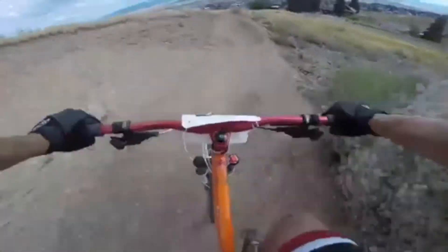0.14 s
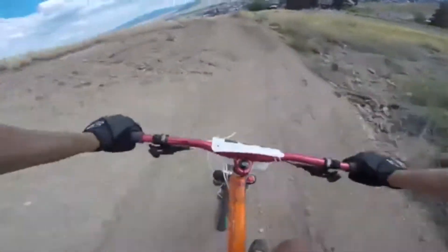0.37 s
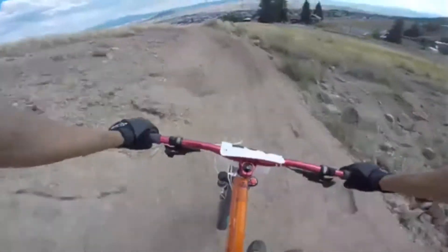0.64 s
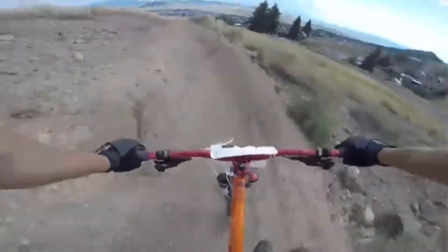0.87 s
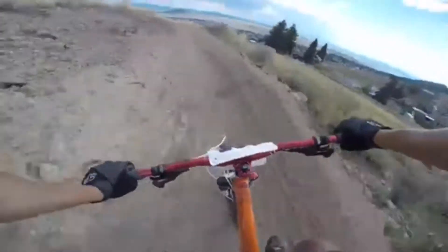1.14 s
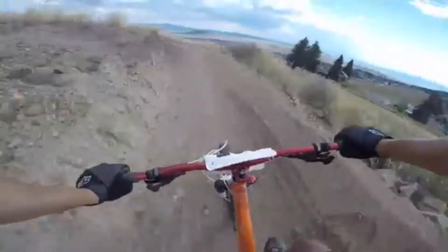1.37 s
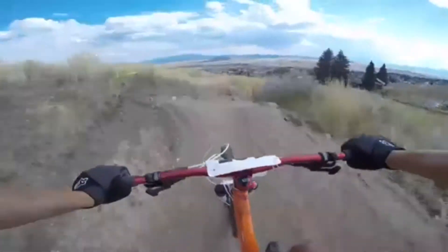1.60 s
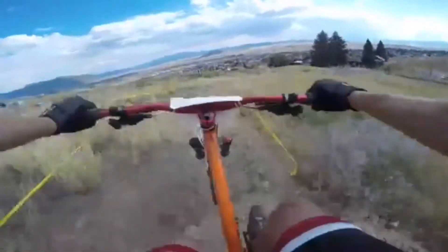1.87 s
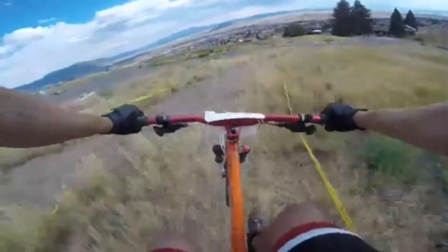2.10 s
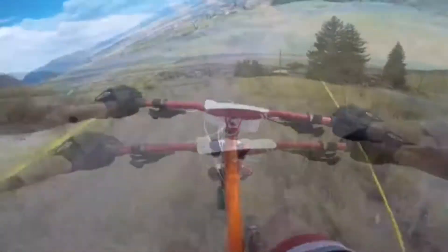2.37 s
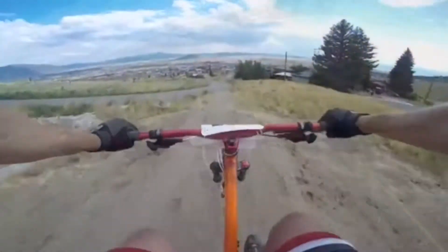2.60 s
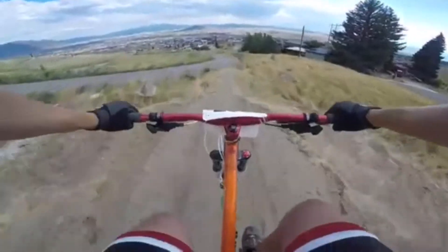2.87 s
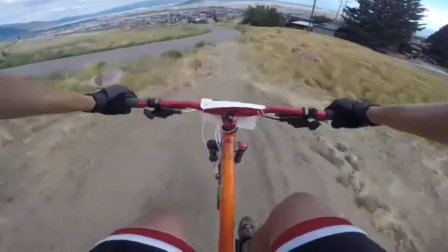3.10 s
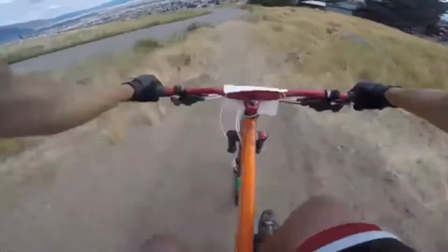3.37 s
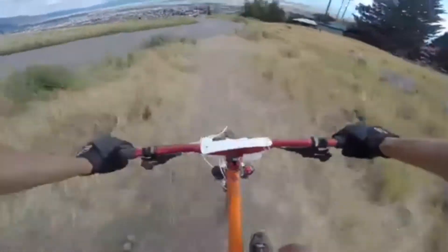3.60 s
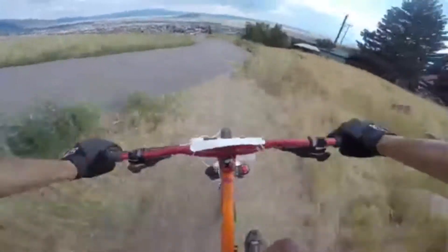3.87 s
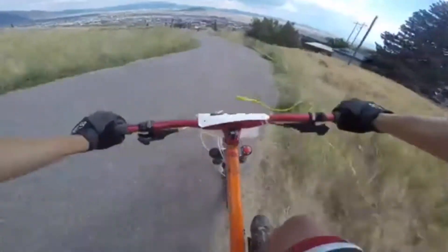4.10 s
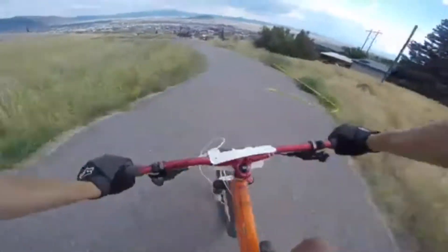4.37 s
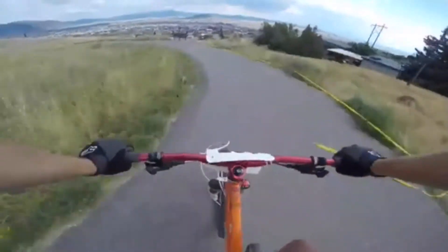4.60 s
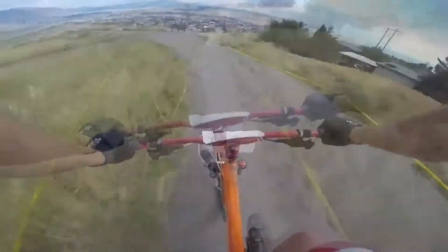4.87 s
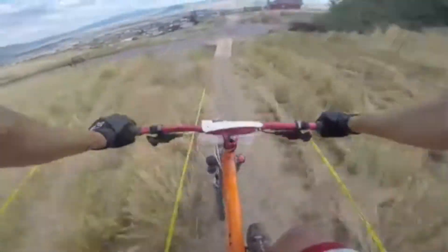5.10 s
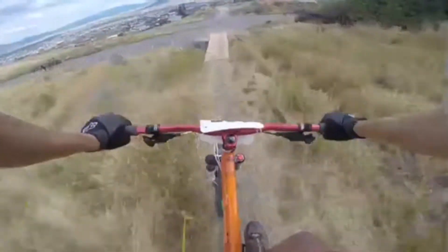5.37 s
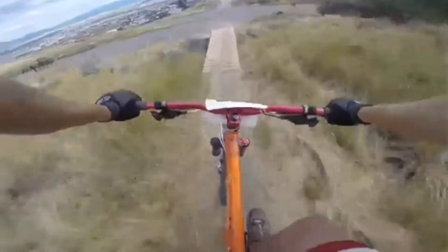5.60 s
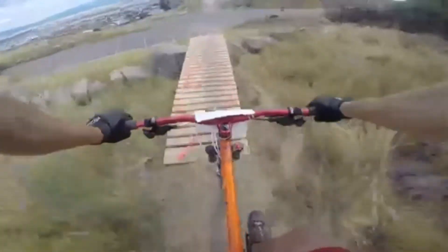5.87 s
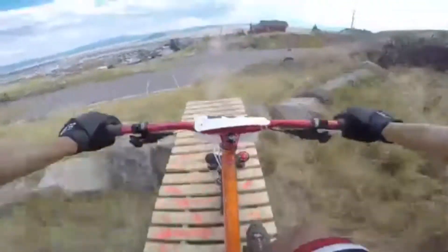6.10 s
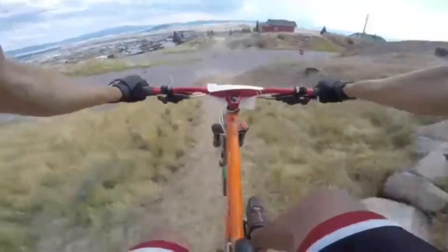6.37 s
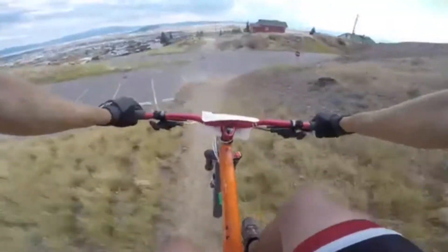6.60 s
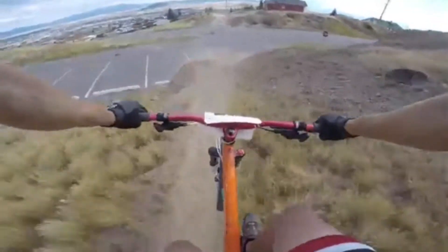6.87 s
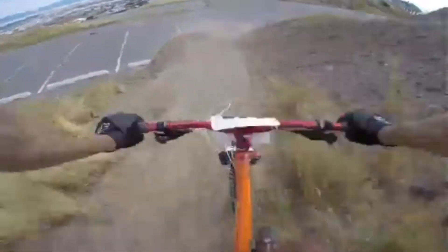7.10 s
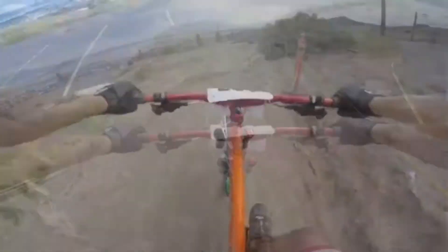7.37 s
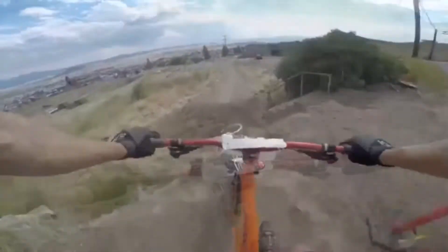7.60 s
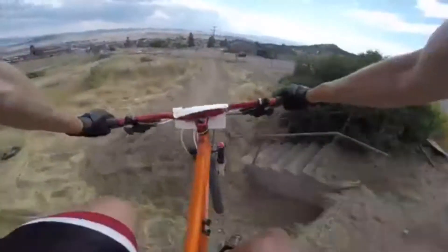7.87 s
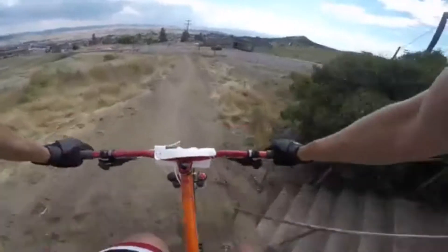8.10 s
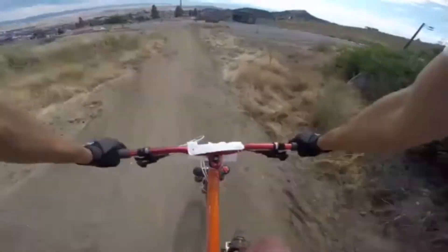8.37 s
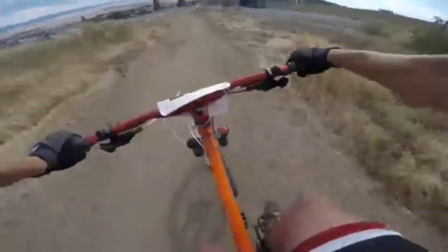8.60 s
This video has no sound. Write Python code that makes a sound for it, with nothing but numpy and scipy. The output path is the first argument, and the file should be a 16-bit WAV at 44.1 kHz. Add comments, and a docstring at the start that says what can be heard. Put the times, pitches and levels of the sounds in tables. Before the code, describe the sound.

Close, boxy rumble and rattle of a bike on a dirt trail, calmer stretches broken by bursts of hard knocks and heavy thumps.

```python
"""A rough rumble and gritty rattle of rolling tyres come first, with faint hiss and whine, then jolts and knocks.
A mountain bike runs down a dirt trail, heard by a small camera in a closed housing on the rider's chest.
Noise grains excite rumble, drone and housing modes; jolts are damped swings of the harness; camera clanks and
chain ticks are noisy contacts through resonances or treble filters. Brake squeals, in two groups, and a low
tread hum are randomly wavering tones; the electronics add shaped noise and steady sines."""
import sys
import numpy as np
from scipy import signal
from scipy.fft import rfft, irfft, next_fast_len
from scipy.io import wavfile
from scipy.ndimage import uniform_filter1d, map_coordinates

SR = 44100
rng = np.random.default_rng(int(sys.argv[2]) if len(sys.argv) > 2 else 0)


def master(y):
    """Save y as 16-bit WAV."""
    cut = np.clip(np.atleast_2d(y).T, -1, 1)
    pcm = np.round(cut * 32767)  # scale
    wavfile.write(sys.argv[1], SR, pcm.astype(np.int16))


def makeup_ratio(level_db):
    """Linear amplitude ratio for a level in decibels (20 dB per factor of ten)."""
    decades = np.asarray(level_db, float) / 20
    return 10 ** decades


N = 384993
T = np.arange(N) / SR
RIDE_SIZE = 2 * next_fast_len(N // 2 + 4096)  # filter length of the steady layers, samples


def spectrum(points, size):
    """Gain per bin of (Hz, dB) points, interpolated over log frequency."""
    hz, db = np.transpose(points)
    bin_hz = np.arange(size // 2 + 1) * SR / size
    return makeup_ratio(np.interp(np.log(bin_hz + 1), np.log(hz), db))


def modes(rows, size):
    """Causal response per bin of resonances in parallel, alternate signs."""
    f = np.arange(size // 2 + 1) * SR / size
    response = 0
    for k, (hz, width_hz, db) in enumerate(rows):
        damping = 1j * f * width_hz
        response = response + (-1) ** k * makeup_ratio(db) * damping / (hz ** 2 - f ** 2 + damping)
    return response


def colour(x, gain):
    """Filter along the last axis."""
    size = 2 * gain.shape[-1] - 2
    return irfft(rfft(x, size) * gain)[..., :x.shape[-1]]


def unit(x):
    """Scale to rms 1."""
    return x / np.sqrt(np.mean(x ** 2))


def walk(rate_hz):
    """Random levels held 1 / rate_hz s and slewed twice; spread near 1."""
    k = int(SR / rate_hz)
    held_levels = np.repeat(rng.standard_normal(N // k + 1), k)
    return 1.3 * uniform_filter1d(uniform_filter1d(held_levels, k), k)[:N]


def grit(rate_hz, spread_db, burst_ms, smooth, flicker_db, flicker_hz):
    """Short scrapes of uneven size over a smooth noise, the whole flickering."""
    sizes = makeup_ratio(spread_db * np.minimum(rng.exponential(size=N), 3.5))
    starts = (rng.random(N) < rate_hz / SR) * sizes
    scrapes = signal.fftconvolve(starts, np.hanning(int(burst_ms * SR / 1000)), "same")
    noise = (unit(scrapes) + smooth) * rng.standard_normal(N)
    return unit(noise * makeup_ratio(flicker_db * walk(flicker_hz)))


def add(out, times_s, waves, lead):
    """Lay each wave into out, starting lead samples before its time."""
    for s, wave in zip(times_s, waves):
        at = np.arange(len(wave)) + int(s * SR) - lead
        inside = (at >= 0) & (at < N)
        out[at[inside]] += wave[inside]
    return out


def rattles(length_ms, swell, fade, tail_db, tail_ms, size=4096):
    """Noisy contacts peaking at sample 512: long ones creep in, short ones snap; a ragged chatter surrounds each."""
    ms = (np.arange(size) - 512) * 1000 / SR
    span = length_ms[:, None]
    rise = np.exp(np.minimum(ms, 0) / np.clip(swell * (span - 2.2), .08, 3))
    fall = np.exp(-np.maximum(ms, 0) / (fade * span))
    ragged = np.repeat(rng.random((len(span), size // 64)) ** 2, 64, axis=1)
    chatter = ragged * np.exp(-np.abs(ms) / tail_ms)
    return rise * (fall + makeup_ratio(tail_db) * chatter), rng.standard_normal(rise.shape)


def ring(contact, gain, peak_db):
    """Contacts through a body, each set to its peak level (root 2 times the loudest 2 ms rms)."""
    y = colour(contact, gain)
    top = np.sqrt(2 * uniform_filter1d(y ** 2, size=88, axis=1).max(axis=1))
    return y * (makeup_ratio(peak_db) / top)[:, None]


def wavering(s, db, hz, width_hz):
    """A tone whose size and phase wander at random, the faster the larger width_hz, spreading its line."""
    t = np.arange(int(s[0] * SR), int(s[-1] * SR)) / SR
    steps = np.cumsum(np.interp(t, s, width_hz)) / SR
    knots = rng.standard_normal((2, 512))
    re, im = (map_coordinates(k, [steps], order=1, mode="wrap") for k in knots)
    carrier = np.exp(2j * np.pi * np.cumsum(np.interp(t, s, hz)) / SR)
    edge = np.clip(np.minimum(t - s[0], s[-1] - t) / .006, 0, 1)
    return makeup_ratio(np.interp(t, s, db)) * edge * ((re + 1j * im) * carrier).real


def held(start_s, length_s, db, attack_s, release_s, foot_db):
    """Times and levels of attack, hold and release."""
    times_s = start_s + np.array([0, attack_s, length_s - release_s, length_s])
    return times_s, db + foot_db * np.array([1, 0, 0, 1])


def shudder(blows):
    """Power that builds up before each blow and dies away after it."""
    rise_s, fall_s = 0.02, 0.031
    s, db = np.transpose(blows)[:2]
    t = np.arange(-16384, 16384) / SR
    shape = np.exp(np.where(t < 0, t / rise_s, -t / fall_s))
    return add(np.zeros(N), s, makeup_ratio(db[:, None]) ** 2 * shape, lead=16384)


# The ride's level controls. Each row: time in seconds, harness shake in dB, tyre grit in dB, grit brightness in dB.
GROUND = [(0, -38.5, -44, -2.5), (0.2, -34, -51.5, 1), (0.41, -40, -50.5, 1), (0.87, -43, -51.5, 2),
          (1.2, -45.5, -47, 0.5), (1.68, -38.5, -50.5, -0.5), (1.86, -47, -51, 2.5), (1.92, -46, -57.5, 10),
          (2.03, -46, -55, 3), (2.1, -41, -62.5, 3), (2.3, -43.5, -60, 1), (2.4, -42, -49.5, 0),
          (2.58, -39, -55.5, 6), (2.68, -45.5, -60, 4), (2.9, -45.5, -65, 2), (3.26, -46, -61, 0),
          (3.29, -38, -47.5, -2), (3.4, -31, -41.5, 3), (3.5, -37, -50, -2), (3.74, -35.5, -48.5, 3.5),
          (3.96, -38.5, -44, 2), (4.18, -33.5, -52, 5), (4.6, -47, -48.5, -4.5), (4.84, -44.5, -54.5, -3),
          (5.06, -40.5, -52.5, 3.5), (5.28, -38.5, -52, 3), (5.76, -37, -52, 2), (6.03, -29, -46.5, 1.5),
          (6.32, -35.5, -44.5, -2.5), (6.5, -39, -55, -1.5), (6.71, -36, -62.5, -2),
          (6.85, -45.5, -61.5, -3), (7.05, -39, -57, -1), (7.2, -26, -62, -3), (7.43, -37, -55, 3),
          (7.63, -33.5, -46.5, -5), (7.8, -28.5, -44.5, -1.5), (8.0, -31.5, -47, 0), (8.08, -31, -56.5, 2),
          (8.42, -39.5, -57.5, -3), (8.6, -19.5, -38.5, -7), (8.73, -28.5, -47, 1)]


def over_ground(sound, law, blows):
    """A steady layer sized by its law: it follows the ground and swells around the blows."""
    shake_ref_db, grit_ref_db = -38, -49
    base_db, per_shake, per_grit, per_bright, shudder_db = law
    s, shake_db, grit_db, bright_db = np.transpose(GROUND)
    db = base_db + per_shake * (shake_db - shake_ref_db) + per_grit * (grit_db - grit_ref_db) + per_bright * bright_db
    gain = np.sqrt(makeup_ratio(np.interp(T, s, db)) ** 2 + makeup_ratio(shudder_db) ** 2 * blows)
    return gain * unit(sound)


# Rumble spectrum, relative. Each row: frequency in Hz, density in dB.
RUMBLE_SPECTRUM = [(10, -34), (22, -0.5), (40, 0.5), (65, -11), (95, -8.5), (130, -14.5), (170, -26.5),
                   (300, -90)]
# Layer law (all laws alike): level in dB at the reference ground, then slopes in dB per dB of shake, of grit and
# of brightness, last the shudder in dB against the blow's table level.
RUMBLE_LAW = (-36.5, 0.71, 0.2, 0, -21.5)


def rumble(jolts):
    """Low grained noise of the shaken harness, swelling around the jolts."""
    grain = grit(rate_hz=30, spread_db=4.9, burst_ms=21, smooth=0.8, flicker_db=1.53, flicker_hz=16)
    return over_ground(colour(grain, spectrum(RUMBLE_SPECTRUM, RIDE_SIZE)), RUMBLE_LAW, jolts)


# Drone spectrum, relative. Each row: frequency in Hz, density in dB.
DRONE_SPECTRUM = [(80, 1), (150, 0.5), (300, 0), (450, -6.5), (600, -4.5), (800, -9), (1100, -14),
                  (2000, -47)]
# Layer law: columns as for the rumble, in dB and dB per dB.
DRONE_LAW = (-52, 0.8, 0.28, -0.5, -31)


def drone(shake, knocks):
    """Low-mid noise in very uneven, fast-flickering grains."""
    grain = grit(rate_hz=50, spread_db=8.5, burst_ms=12, smooth=2.0, flicker_db=2.85, flicker_hz=45)
    return over_ground(colour(shake * grain, spectrum(DRONE_SPECTRUM, RIDE_SIZE)), DRONE_LAW, knocks)


# Lower housing modes. Each row: frequency in Hz, width in Hz, relative level in dB.
LOWER_MODES = [(1387, 365, -2.5), (1651, 198, 3)]
# Layer law: columns as for the rumble, in dB and dB per dB.
LOWER_LAW = (-50, -0.02, 1, -.55, -34)


def lower_housing(shake, knocks):
    """Tyre grit rings the lower housing modes."""
    grain = grit(rate_hz=50, spread_db=2.8, burst_ms=6, smooth=2.6, flicker_db=1.2, flicker_hz=50)
    return over_ground(colour(shake * grain, modes(LOWER_MODES, RIDE_SIZE)), LOWER_LAW, knocks)


# Upper housing modes. Each row: frequency in Hz, width in Hz, relative level in dB.
UPPER_MODES = [(2241, 198, 0.5), (2543, 183, 0.5), (2850, 307, -8)]
# Layer law: columns as for the rumble, in dB and dB per dB.
UPPER_LAW = (-49.5, 0.01, 0.99, 0.4, -33)


def upper_housing(shake, knocks):
    """Tyre grit rings the upper housing modes."""
    grain = grit(rate_hz=50, spread_db=2.8, burst_ms=5.5, smooth=2.6, flicker_db=1.2, flicker_hz=50)
    return over_ground(colour(shake * grain, modes(UPPER_MODES, RIDE_SIZE)), UPPER_LAW, knocks)


# Chain contact spectrum, relative. Each row: frequency in Hz, density in dB.
TICK_SPECTRUM = [(4000, -57), (6000, 1), (8000, -6.5), (11000, -12), (14500, -28), (16000, -42)]
# Treble modes. Each row: frequency in Hz, width in Hz, relative level in dB.
TREBLE_MODES = [(3420, 840, -1), (4585, 645, 4.5), (5720, 450, 2.5), (6640, 1000, -1.5), (7750, 5500, -12),
                (11000, 3000, -43.5)]
# Housing wall, which dulls the top. Each row: frequency in Hz, gain in dB.
WALL = [(2600, 6), (3400, 2), (7000, -2), (9500, -3), (15000, -43)]
# Layer law: columns as for the rumble, in dB and dB per dB.
JINGLE_LAW = (-56, 0, 1.06, 0.04, -42)


def jingle(shake, knocks):
    """Grit rings the treble modes behind the wall; chain links touch, sparse, bright and dry."""
    links = grit(rate_hz=22, spread_db=4.6, burst_ms=2.8, smooth=.12, flicker_db=3.6, flicker_hz=13)
    links = unit(colour(links, spectrum(TICK_SPECTRUM, RIDE_SIZE)))
    grain = grit(rate_hz=70, spread_db=2.4, burst_ms=10, smooth=2.3, flicker_db=2.1, flicker_hz=25)
    body = modes(TREBLE_MODES[:5], RIDE_SIZE) * spectrum(WALL, RIDE_SIZE) ** 2
    return over_ground(unit(colour(shake * grain, body)) + makeup_ratio(-18.0) * links, JINGLE_LAW, knocks)


def rolling():
    """The steady parts of the ride, each with its own grain and flicker."""
    knocks = shudder(CLANKS)
    shake = makeup_ratio(1.5 * walk(25))  # small bumps, common to all but the rumble and the links
    return (rumble(shudder(THUDS)) + drone(shake, knocks) + lower_housing(shake, knocks)
            + upper_housing(shake, knocks) + jingle(shake, knocks))


# Hiss spectrum, relative. Each row: frequency in Hz, density in dB.
HISS_SPECTRUM = [(300, -9.5), (1000, -20), (3000, -35), (6000, -33), (10000, -42), (15000, -54)]
# Steady lines. Each row: frequency in Hz, rms level in dB.
WHINE = [(8780, -84.5), (11687, -91), (11719, -89), (12839, -92), (14626, -113)]


def electronics():
    """Microphone hiss and a few thin steady lines."""
    hiss_db = -57
    gain = spectrum(HISS_SPECTRUM, 2 * next_fast_len(N // 2 + 1))
    out = makeup_ratio(hiss_db) * unit(colour(rng.standard_normal(N), gain))
    for hz, db in WHINE:
        out += np.sqrt(2) * makeup_ratio(db) * np.sin(2 * np.pi * hz * T)
    return out


# Jolts through the harness, before its filter. Each row: time of the peak in seconds, swing level in dB,
# length in ms between the -6 dB points.
THUDS = [(0.044, -19, 11.8), (0.149, -3.5, 18), (0.379, -23, 19), (0.54, -27.5, 43), (0.724, -21, 22),
         (0.991, -29, 50), (1.056, -23.5, 26), (1.26, -27.5, 23), (1.383, -21.5, 19), (1.713, -26, 12),
         (1.804, -29, 37), (1.97, -31, 18), (2.052, -24.5, 11), (2.397, -22, 28), (2.432, -25, 18),
         (2.618, -29, 46), (2.774, -32, 18), (2.87, -21.5, 22), (3.216, -22.5, 31), (3.331, -9, 20),
         (3.4, 1, 14.3), (3.442, -20.5, 15), (3.5, -21, 9.8), (3.53, -21.5, 16), (3.562, -26, 10),
         (3.692, -26, 11), (3.856, -20.5, 14), (3.968, -22, 31), (4.075, -21.5, 5.9), (4.157, -25, 6.5),
         (4.406, -20.5, 48), (4.54, -26.5, 21), (4.586, -27.5, 24), (4.864, -24, 14), (5.044, -29, 22),
         (5.124, -23.5, 16), (5.276, -19, 25), (5.305, -28, 52), (5.504, -28, 30), (5.793, -22, 22),
         (5.899, -24, 8.1), (6.033, -14.5, 8.2), (6.081, -12, 42), (6.197, -24, 22), (6.437, -26.5, 16),
         (6.684, -30, 8.3), (6.763, -20, 19), (7.098, -21.5, 6.7), (7.161, -10, 5.5), (7.187, -7.5, 10),
         (7.231, -9, 12), (7.261, -1, 7.8), (7.315, -17.5, 62), (7.401, -30, 8), (7.632, -23, 12.5),
         (7.738, -25, 23), (7.767, -21, 10.7), (7.841, -18, 6.4), (7.879, -26, 23), (8.107, -24.5, 26),
         (8.284, -25, 24), (8.435, -24.5, 8.2), (8.529, -12.5, 3.4), (8.556, -9.5, 9.9), (8.586, -8, 48),
         (8.628, -10, 4.8), (8.654, -12.5, 120), (8.718, -23, 9)]


def thuds():
    """Each jolt is about one swing of the harness, then a slower, weaker rebound."""
    s, db, ms = np.transpose(THUDS)[:, :, None]
    hz = 51.6 * (20 / ms) ** 0.46  # 51.6 Hz for a 20 ms jolt; shorter jolts swing faster
    t = np.arange(-4096, 4096) / SR
    phase = 2 * np.pi * rng.random((len(s), 2)).T[:, :, None]
    swing = makeup_ratio(-6 * (2000 * t / ms) ** 2) * np.cos(2 * np.pi * hz * t + phase[0])
    rebound = makeup_ratio(-6.0) * np.exp(-((t - .016) / 0.017) ** 2) * np.cos(2 * np.pi * 27 * t + phase[1])
    harness = spectrum([(6, -57), (18, -6.5), (170, 2), (300, -30)], size=8192)
    waves = colour(makeup_ratio(db) * (swing + rebound), harness)
    return add(np.zeros(N), s[:, 0], waves, lead=4096)


# Camera knocks in its housing. Each row: time in seconds, peak in dB, length in ms, dull knock in dB and
# upper modes in dB, the last two against the peak.
CLANKS = [(0.0533, -42, 6.1, -15, -10), (0.089, -28, 19, -30, -2), (0.1384, -32, 4.8, 8, -3),
          (0.1607, -24.5, 4.5, -7, -3.5), (0.2158, -29.5, 4.2, -6, -7), (0.2253, -33, 3.3, 3, -14),
          (0.3526, -31, 2.3, -13, -8), (0.904, -27.5, 2.8, -22, -4.5), (1.074, -38, 5, -21, 1),
          (1.117, -28.5, 3.3, -20, -1.5), (1.4184, -35, 8.2, -16, -1), (2.0018, -39.5, 7.4, 1, -1),
          (2.281, -41.5, 6.6, -12, -5), (2.396, -40, 7, 2.5, -9), (3.2817, -34.5, 18, -18, -2),
          (3.336, -19, 3.2, -6, -1), (3.3818, -23.5, 5.9, -1.5, -6.5), (3.3922, -33, 2.6, 8.5, -6),
          (3.4539, -30, 5.4, -3, -9), (3.4921, -16.5, 7.7, -9.5, -6), (3.553, -18, 5.8, -8, -2.5),
          (3.9044, -15.5, 5.9, -8, -2.5), (4.069, -18.5, 4.2, -10, -6.5), (4.147, -16.5, 6.6, -8, -6.5),
          (4.2628, -48, 7.9, 5, -4), (4.2793, -14, 2.86, -7, -6), (4.305, -17.5, 1.6, -6, -5.5),
          (4.3287, -28.5, 1.1, -1, -6), (4.4134, -18, 14, -7, -1), (4.436, -18, 9.2, -9, -3),
          (5.569, -17, 3.2, -14.5, -3), (5.6764, -37, 8.2, -16, -11), (5.809, -32.5, 4.7, -23, -2),
          (5.8595, -22.5, 2, -5, -8), (5.9384, -31, 3.5, -3.5, -12), (5.98, -27, 5.1, -12, -4),
          (5.991, -28, 5.4, -10, -7), (6.0272, -18.5, 4.4, 4.5, -5), (6.109, -29.5, 7.5, -32, -1.5),
          (6.2898, -32, 2, 3.5, -0.5), (7.0965, -21.5, 1.9, -10, -4), (7.1091, -29.5, 1, 1.5, -4),
          (7.143, -11.5, 2.8, -10.5, -17), (7.1565, -16, 4.9, 4.5, -7), (7.1778, -22, 9, -4, -10),
          (7.1922, -20, 3.3, 2, 1), (7.1975, -9, 4.5, -5, -2), (7.209, -18.5, 4.2, 1, -2),
          (7.235, -18.5, 7.1, -8, -1.5), (7.2416, -24, 3.6, 5, 2), (7.254, -9.5, 2.27, -2.5, 0),
          (7.2717, -16, 4.8, -6, -3), (7.331, -45, 8, 10, -7), (7.3703, -25, 1.4, -5, -5),
          (7.394, -28, 6.4, 5, -4.5), (7.4202, -36, 4.4, -2, -11), (7.6142, -17.5, 4.9, -12.5, -2.5),
          (7.8423, -15, 5.2, -13.5, -7), (8.0087, -35, 8.5, -0.5, -2), (8.3044, -45.5, 4.6, 0, 1),
          (8.4229, -19, 6, -10.5, -3), (8.502, -15.5, 3.5, -4, -3), (8.5215, -18, 8, 5, -3.5),
          (8.5444, -16, 5.9, -1.5, -3), (8.56, -12.5, 4.7, -6.5, -2), (8.613, -18, 7, 0.5, 0),
          (8.6192, -20.5, 4.3, -6, 2), (8.663, -27.5, 8.7, -4, -8), (8.7202, -27.5, 7.2, -2, -11)]
# Dull knock modes. Each row: frequency in Hz, width in Hz, relative level in dB.
KNOCK_MODES = [(164, 156, -2.5), (345, 95, 2.5), (544, 115, 0.5), (891, 132, -4.5)]


def clanks():
    """One contact excites both groups of housing modes, a dull knock below and a crack above."""
    s, db, ms, knock_db, upper_db = np.transpose(CLANKS)
    crack_db = -13 - .2 * knock_db + 0.11 * db  # dull or weak knocks crack less
    shape, noise = rattles(ms, swell=.5, fade=.3, tail_db=-13, tail_ms=6.5)
    contact = shape * noise
    soft = spectrum([(3000, 10), (6000, -26), (15000, -2)], size=8192)  # plastic contact carries little treble
    # what the upper modes leave of the peak power stays in the lower ones
    lower_db = 10 * np.log10(np.clip(1 - makeup_ratio(upper_db) ** 2, .12, 1))
    treble = modes(TREBLE_MODES, size=8192) * spectrum(WALL, size=8192)
    waves = (ring(contact, modes(LOWER_MODES, size=8192) * soft, db + lower_db)
             + ring(contact, modes(UPPER_MODES, size=8192) * soft, db + upper_db)
             + ring(contact, modes(KNOCK_MODES, size=8192) * soft, db + knock_db)
             + ring(shape ** 0.76 * noise, treble, db + crack_db))
    return add(np.zeros(N), s + 0.2975 * ms / 1000, waves, lead=512)


# Chain and cable ticks. Each row: time in seconds, peak in dB, length in ms.
TICKS = [(0.0563, -44.5, 6), (0.152, -41, 5.2), (1.199, -41, 4.2), (1.861, -43, 6.1), (2.2698, -63, 4.3),
         (2.397, -55, 6.7), (2.4712, -54, 4.6), (2.7147, -65, 10), (3.2977, -46.5, 3.4), (3.4024, -43, 5.5),
         (3.4303, -43.5, 11), (3.6067, -44, 6.2), (3.852, -44.5, 5), (3.955, -45, 6.9),
         (3.9702, -36.5, 6.9), (4.1, -45, 7.9), (4.3225, -43, 9.6), (4.333, -46, 13), (4.3654, -46, 6.9),
         (4.5001, -51, 5.3), (5.109, -54.5, 4.2), (5.299, -47, 3.1), (5.44, -47.5, 3.2), (5.818, -50, 13),
         (5.884, -42, 4.1), (5.951, -50, 4.3), (6.006, -49, 3.2), (6.044, -44.5, 4.4), (6.1736, -44, 10),
         (6.231, -47, 6.8), (7.123, -50, 3.8), (7.166, -43, 7.3), (7.1873, -29, 6.8), (7.3117, -45, 6.6),
         (7.4147, -44.5, 7.5), (7.72, -53, 4.7), (8.5134, -41, 12), (8.5543, -39, 4.2), (8.611, -37.5, 10),
         (8.7065, -41.5, 4.3)]


def ticks():
    """Thin metallic ticks, mostly treble, over a scattered lower body; hard ticks are thinner."""
    s, db, ms = np.transpose(TICKS)
    body_db = -14 - 0.34 * db + 3 * rng.standard_normal(len(s))  # against the peak
    shape, noise = rattles(ms, swell=0.8, fade=0.78, tail_db=-0.65, tail_ms=19)
    body = modes(TREBLE_MODES[:3], size=8192) * spectrum(WALL, size=8192)
    waves = (ring(shape * noise, spectrum(TICK_SPECTRUM, size=8192), db)
             + ring(shape * noise, body, db + body_db))
    return add(np.zeros(N), s + 0.31 * ms / 1000, waves, lead=512)


# Brake squeals. Each row: start in seconds, length in seconds, nominal level in dB, first and last frequency in Hz.
SQUEALS = [(1.411, .17, -44, 13000, 12900), (1.591, 0.068, -50, 12900, 12900),
           (2.383, 0.14, -50.5, 13100, 13550), (2.549, 0.098, -55, 13400, 13200),
           (2.64, 0.065, -65, 12950, 12900)]


def brake():
    """Pad and disc chatter in a very high, rough squeal that grabs and slips."""
    grab_s, slip_s, width_hz, foot_db = 0.01, 0.032, 650, -35
    waves = []
    for start_s, length_s, db, first_hz, last_hz in SQUEALS:
        s, level_db = held(start_s, length_s, db, grab_s, slip_s, foot_db)
        hz = np.interp(s, s[[0, -1]], [first_hz, last_hz])
        waves.append(wavering(s, level_db, hz, width_hz + 0 * s))
    roughness = unit(makeup_ratio(4.1 * walk(140)))
    return roughness * add(np.zeros(N), np.transpose(SQUEALS)[0], waves, lead=0)


# Tyre knob hums. Each row: start in seconds, length in seconds, nominal level in dB.
KNOBS = [(4.49, 0.17, -51), (4.68, 0.13, -55)]


def knobs():
    """Tread blocks strike the ground in a regular, slightly unsteady hum of rising pitch."""
    base_hz, rise_hz_per_s, width_hz = 386, 60, 32
    attack_s, release_s, foot_db = .035, 0.069, -10
    waves = []
    for start_s, length_s, db in KNOBS:
        s, level_db = held(start_s, length_s, db, attack_s, release_s, foot_db)
        hz = base_hz + rise_hz_per_s * (s - KNOBS[0][0])
        waves.append(wavering(s, level_db, hz, width_hz + 0 * s))
    return add(np.zeros(N), np.transpose(KNOBS)[0], waves, lead=0)


def scene():
    """All sources summed at one microphone."""
    return (rolling() + electronics() + thuds() + clanks() + ticks() + brake() + knobs())[None]


def band_limit(x):
    """A steep low-pass at the top of the band."""
    return signal.sosfilt(signal.butter(12, 16080, fs=SR, output="sos"), x)


def record(dry):
    """The input stage cuts the top at 15.3 kHz and rounds off only the biggest jolts."""
    low_pass = signal.ellip(8, .2, 60, 15300, fs=SR, output="sos")
    mix = signal.sosfilt(low_pass, dry)
    mix = mix / (1 + mix ** 6) ** (1 / 6)
    return band_limit(mix)


dry = scene()
out = record(dry)
master(out)
```